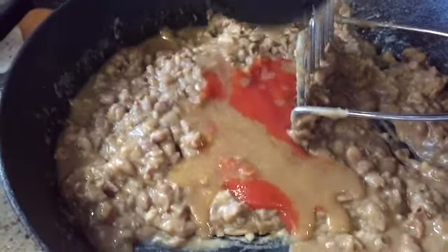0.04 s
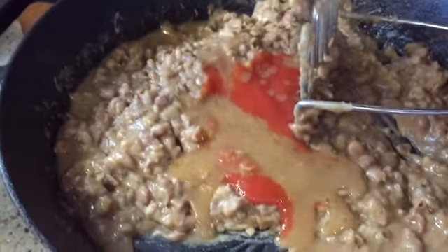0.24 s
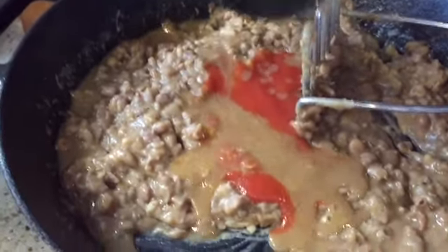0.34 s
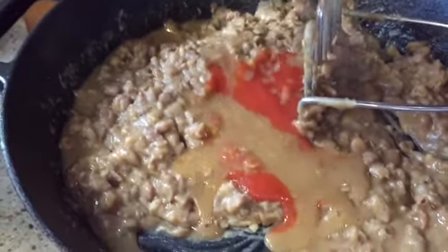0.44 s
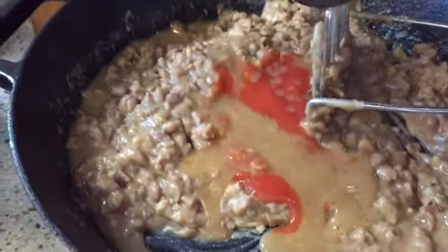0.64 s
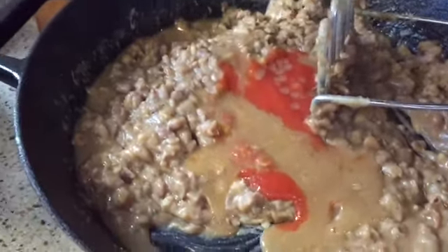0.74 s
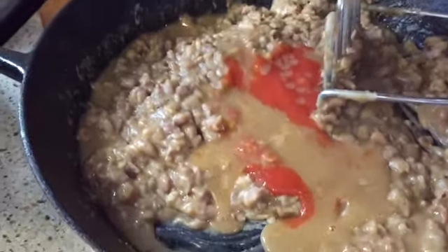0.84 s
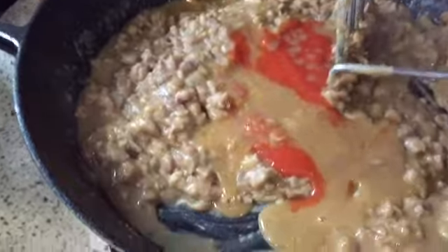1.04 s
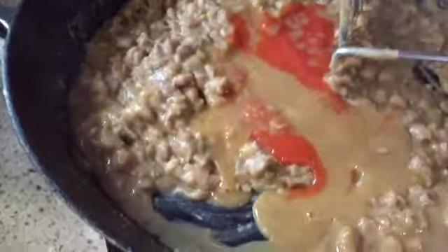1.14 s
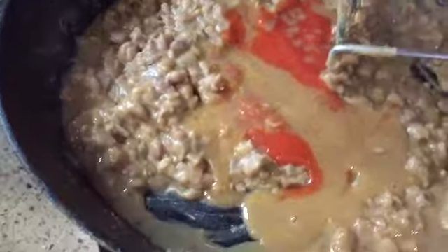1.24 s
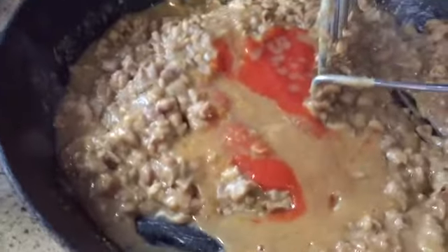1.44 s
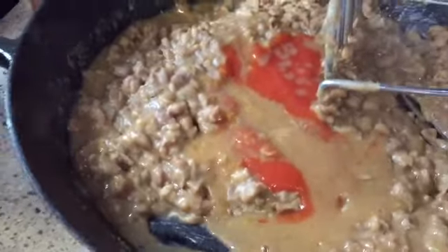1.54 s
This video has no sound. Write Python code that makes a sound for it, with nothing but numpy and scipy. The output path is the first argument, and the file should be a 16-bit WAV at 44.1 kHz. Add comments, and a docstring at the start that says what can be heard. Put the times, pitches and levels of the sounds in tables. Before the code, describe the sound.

A metal masher knocks on a cast iron skillet of soft food. An earlier clank's tail fades at the start, with a faint touch at 0.1 s. Four short, hard clinks follow at about 0.24, 0.40, 0.54 and 0.71 s, the third thickened by a flat slap. Brief pan rings and small-room echo die by 0.95 s, leaving low swelling rumble, hum, faint hiss and sparse tiny wet ticks until 1.6 s.

```python
"""Masher on a cast iron skillet

A steel masher touches the rim of a skillet full of soft food once, faintly, then knocks on it four times,
in a small kitchen. Each contact mixes damped sines for the clink and the fainter, longer pan ring with
a crack of shaped noise. Slaps of the flat masher, wet ticks, low swelling tones and faint pings are
scattered between. Below lie a low appliance rumble of swelling noise, a wavering hum and a steady hiss."""
import sys
import numpy as np
from scipy import signal
from scipy.io import wavfile

SR = 44100
rng = np.random.default_rng(int(sys.argv[2]) if len(sys.argv) > 2 else 0)


def boost_factor(decibels):
    """Convert a level in decibels to a linear amplitude factor."""
    exponent = np.asarray(decibels, float) / 20
    return 10 ** exponent


def file_out(sig):
    """Save sig as 16-bit WAV at sys.argv[1]."""
    # one column per channel
    cols = np.atleast_2d(sig).T
    # limit, then scale
    lim = np.clip(cols, -1, 1)
    pcm = np.round(lim * 32767).astype(np.int16)
    wavfile.write(sys.argv[1], SR, pcm)


N = 70560  # samples, 1.6 s

# a faint touch, then four knocks on the rim:
# start_s, level_db, brightness_db (per octave above the knee), body_db, ring_db
RIM_CONTACTS = [(0.1055, -35.5, -5, 2, 5), (0.2350, -9, -1, 2, -1.5), (0.3988, -12, 0.5, 0.5, -5),
                (0.5436, -11, 4, 5, -5), (0.7140, -14, -0.5, 8.5, 0)]


def knocks():
    """Masher against rim: the touch and the four knocks, after an earlier one whose tail still rings."""
    out = np.zeros(N)
    earlier = (-0.21, -7.5, 0, 0, 0)
    for row in [earlier] + RIM_CONTACTS:
        add(out, row[0], knock(*row))
    return out


def knock(start_s, level_db, bright_db, body_db, ring_db):
    """One contact: steel clink, crack and long rings, with the wake of pan and room."""
    t = np.arange(SR // 2) / SR
    x = clink(t, bright_db) + long_rings(t, start_s) + crack(t, bright_db)
    return boost_factor(level_db) * (x + wake(t, bright_db, body_db, ring_db))


# masher modes, damped by hand and food; neighbours start in opposite sense: pitch_hz, level_db, t60_s
MASHER_MODES = [(1453, -16.5, .03), (1960, -1.5, 0.021), (2195, 0.5, 0.015), (2750, -13.5, 0.016),
                (3786, -20.5, .02), (3985, -12, 0.035), (4343, -17.5, .02), (5427, -17.5, .04),
                (6060, -16, 0.023), (7030, -22, .03), (8543, -28.5, .04), (9300, -28, 0.0198),
                (11910, -29.5, 0.029)]
# first contact of steel on iron: pitch_hz, level_db, t60_s
SNAP_MODES = [(4000, -0.5, 0.00516), (6000, -3, 0.0045), (9320, -8, 0.0053), (12320, -16, 0.0015)]


def clink(t, bright_db):
    """Short steel modes of the masher, opened by the still shorter snap of first contact."""
    masher = modes(tilted(MASHER_MODES, bright_db), t)
    snap = boost_factor(bright_db) * modes(SNAP_MODES, t, turn=0.78)
    return thin(masher + snap)


# long rings, probably the skillet handle, woken by sharp contact: pitch_hz, level_db, t60_s
HANDLE_MODES = [(593.7, -41, 1), (840, -45.5, 0.21), (1072, -40, 0.47), (1470, -46, 0.29), (1780, -40, .45),
                (3195, -45, 0.26)]


def long_rings(t, start_s):
    """Lightly damped modes that beat gently until they are stilled."""
    stilled_s, stilled_t60_s = 0.886, 0.15
    stilling = boost_factor(-60 * np.maximum(t + start_s - stilled_s, 0) / stilled_t60_s)
    return modes(HANDLE_MODES, t, beat=0.35) * stilling * fade_end(t)


# colour of the crack: pitch_hz, density_db (per Hz, relative)
CRACK_COLOUR = [(200, -21.5), (600, -24), (1500, -5), (3000, 1), (4500, 6), (6500, 5), (10000, -6),
                (16000, -17)]


def crack(t, bright_db):
    """Noise burst of the impact, louder on bright knocks."""
    level_db = -11.5 + 0.65 * bright_db
    return boost_factor(level_db) * bands(CRACK_COLOUR, len(t)) * fall(t, 0.037)


# the flat of the masher follows onto the wall: start_s, level_db, body_db, ring_db
WALL_SLAPS = [(0.2435, -26, 5, 8), (0.5531, -7.5, -4.5, -1.5), (0.7235, -29.5, 4, 3),
              (0.7256, -21.5, -1, 0)]
# the slap, quickly stifled: pitch_hz, level_db, t60_s
FLAT_MODES = [(947.5, -16, 0.083), (1294, -12, 0.038), (1836, -6.5, 0.017), (2210, -4.5, 0.014),
              (2680, -10, 0.014), (3202, -13.5, .012)]


def slaps():
    """Flat steel on the pan wall: stifled modes and a dark wake."""
    out, t = np.zeros(N), np.arange(SR // 3) / SR
    for start_s, level_db, body_db, ring_db in WALL_SLAPS:
        slap = thin(modes(FLAT_MODES, t)) + wake(t, -12, body_db, ring_db)
        add(out, start_s, boost_factor(level_db) * slap)
    return out


def wake(t, bright_db, body_db, ring_db):
    """What follows any contact: ring of the wall, dull body and the room's return."""
    x = wall_ring(t, ring_db) + dull_body(t, body_db) + room_return(t, bright_db, body_db)
    return cut(x, 16250) * fade_end(t)


# skillet wall: pitch_hz, level_db, t60_s
WALL_MODES = [(537.7, -29.5, 0.16), (654, -36.5, .16), (830, -40.5, .2), (958.7, -30, 0.2),
              (1320, -33, .17), (1435, -31.5, 0.094), (1658, -39, 0.12), (1965, -33, .18),
              (2270, -33.5, 0.2), (2500, -35, 0.27), (2518, -44, 0.38), (2825, -38.5, .25),
              (3014, -46, 0.24), (2958, -46.5, .25)]


def wall_ring(t, ring_db):
    """Faint longer iron modes that beat strongly."""
    return boost_factor(ring_db) * modes(WALL_MODES, t, beat=0.7)


# dull body of pan and stove: pitch_hz, density_db (per Hz, relative)
THUD_COLOUR = [(120, -10.5), (300, -13), (600, -4), (1100, -6.5), (2000, -1), (3000, -7), (5000, -14)]


def dull_body(t, body_db):
    """Soft thud of pan and stove: noise that rises a little late and dies quickly."""
    return boost_factor(-13 + body_db) * bands(THUD_COLOUR, len(t)) * fall(t, 0.08, rise=0.012)


# colour of the room return: pitch_hz, density_db (per Hz, relative)
ROOM_COLOUR = [(150, -9.5), (400, -3.5), (900, 0.5), (2000, -3), (3500, -7), (6000, -5), (10000, -19),
               (16000, -23)]
# decay of the room: pitch_hz, t60_s
ROOM_DECAY = [(150, 0.15), (500, .33), (1500, 0.29), (3000, .28), (5000, .2), (8000, 0.21), (16000, .15)]


def room_return(t, bright_db, body_db):
    """Small-room tail: noise bands each with its own decay, partly following the blow's tone."""
    follows = 0.32  # dB per dB of brightness or body
    colour = tilted(ROOM_COLOUR, follows * bright_db)
    tail = bands(colour, len(t), lambda hz: fall(t, at_hz(ROOM_DECAY, hz), rise=0.004))
    return boost_factor(-30 + follows * body_db) * tail


# small wet ticks of food and wire: start_s, level_db (before the envelope), pitch_hz, t60_s
WET_TICKS = [(0.014, -52.5, 6800, 0.014), (0.087, -63, 7600, 0.035), (0.095, -54, 2500, 0.032),
             (0.1062, -52, 6100, 0.027), (0.106, -45, 1080, 0.056), (.116, -48, 1940, .03),
             (0.121, -54, 2500, 0.018), (0.145, -50, 3020, 0.0072), (0.177, -50, 4000, 0.0071),
             (0.212, -56.5, 2000, 0.06), (0.657, -45.5, 5340, 0.0048), (0.8527, -57.5, 3000, 0.018),
             (1.073, -59, 3500, .02), (1.2131, -49, 2955, 0.029), (1.2135, -70, 6000, .015),
             (1.43, -63, 8000, 0.019), (1.585, -61, 5494, 0.024)]


def ticks():
    """Food and wire: short puffs of noise round one pitch."""
    out, t = np.zeros(N), np.arange(SR // 10) / SR
    half_band = 2 ** (0.45 / 2)  # the band spans 0.45 octave
    for start_s, level_db, hz, t60 in WET_TICKS:
        band = signal.butter(2, [hz / half_band, hz * half_band], "band", fs=SR, output="sos")
        puff = rms_one(signal.sosfilt(band, rng.standard_normal(len(t))))
        add(out, start_s, boost_factor(level_db) * puff * fall(t, t60, rise=0.0011))
    return out


# low tones, most of them after a knock: start_s, level_db (before the envelope), pitch_hz, t60_s
LOW_TONES = [(.0, -52.5, 296, .12), (.236, -35.5, 185.5, 0.14), (.252, -37.5, 334.2, 0.23),
             (.27, -39.5, 136.3, 0.21), (.415, -36.5, 333.4, 0.25), (.545, -43, 139.2, 0.078),
             (.58, -56, 322, 0.49)]


def hoots():
    """Low sines that swell in softly and die away."""
    return sines(LOW_TONES, 0.015)


# faint pings: start_s, level_db (before the envelope), pitch_hz, t60_s
FAINT_PINGS = [(0.757, -32.5, 2247, 0.037), (1.478, -52.5, 296.7, 0.11), (1.482, -58.5, 1670, .12),
               (1.488, -65.5, 3670, 0.073)]


def pings():
    """Faint decaying sines with a quicker onset."""
    return sines(FAINT_PINGS, 0.0035)


# colour of the rumble: pitch_hz, density_db (per Hz, relative)
RUMBLE_COLOUR = [(15, -63.5), (25, -37), (35, -15.5), (45, 3), (103, 2.5), (119, 0), (135, -5),
                 (186, -18.5), (220, -31.5), (300, -26), (390, -51), (660, -120)]
# swell of the rumble: start_s, level_db
RUMBLE_SWELL = [(0.0, -50), (0.142, -51.5), (0.172, -49), (0.316, -43.5), (0.36, -62.5), (0.396, -47),
                (0.418, -53.5), (0.45, -48.5), (0.658, -53), (0.672, -50.5), (0.97, -48), (1.01, -57.5),
                (1.126, -47.5), (1.23, -59), (1.3, -46.5), (1.456, -57), (1.484, -48), (1.6, -55)]


def rumble():
    """Low appliance rumble: shaped noise whose level swells and sinks."""
    swell_db = np.interp(np.arange(N) / SR, *np.transpose(RUMBLE_SWELL))
    return boost_factor(swell_db) * bands(RUMBLE_COLOUR, N)


def hum():
    """Wavering line in the rumble: noise through a very narrow band."""
    centre_hz, width_hz, level_db = 108, 5.1, -59
    edges = [centre_hz - width_hz / 2, centre_hz + width_hz / 2]
    line = signal.butter(1, edges, "band", fs=SR, output="sos")
    settled = signal.sosfilt(line, rng.standard_normal(2 * N))[N:]
    return boost_factor(level_db) * rms_one(settled)


# colour of the hiss: pitch_hz, density_db (per Hz, relative)
HISS_COLOUR = [(150, -41.5), (250, -10.5), (282, -16), (544, -7.5), (1050, -7), (1250, -9), (1510, -10.5),
               (2440, -13.5), (4630, -17.5), (15500, -24.5)]


def hiss():
    """Steady shaped noise at the bottom of the scene."""
    return boost_factor(-69) * cut(bands(HISS_COLOUR, N), 16250)


def modes(table, t, turn=-1., beat=0.):
    """Decaying sines, each struck with a slightly different strength; split pairs beat."""
    hz, db, t60 = np.transpose(table)[:, :, None]
    sense = turn ** np.arange(len(table))[:, None]  # sign or weight from one mode to the next
    beat_hz = rng.uniform(8, 35, db.shape)
    waver = 1 + beat * np.sin(2 * np.pi * (beat_hz * t + rng.random(db.shape)))
    struck_db = db + rng.normal(0, 2, db.shape)
    envelope = boost_factor(struck_db - 60 * t / t60)
    return np.sum(sense * waver * envelope * np.sin(2 * np.pi * hz * t), axis=0)


def sines(table, rise_s):
    """Single sines with a soft onset, placed by a table."""
    out, t = np.zeros(N), np.arange(SR // 2) / SR
    for start_s, level_db, hz, t60 in table:
        add(out, start_s, boost_factor(level_db) * np.sin(2 * np.pi * hz * t) * fall(t, t60, rise_s))
    return out


def bands(spectrum, size, shape=lambda hz: 1):
    """Third-octave bands of noise, each with its level and envelope; rms 1 before the envelope."""
    warm_up = 8000  # samples for the filters to settle
    white, out, plain = rng.standard_normal((2, size + warm_up)), 0, 0
    edges = 22 * 2 ** np.arange(0, 9.7, 1 / 3)
    for k, (low, high) in enumerate(zip(edges, edges[1:])):
        hz = np.sqrt(low * high)
        if spectrum[0][0] / 1.2 < hz < spectrum[-1][0] * 1.2:
            sos = signal.butter(2, [low, high], "band", fs=SR, output="sos")
            # neighbouring bands draw on different noise
            band = boost_factor(at_hz(spectrum, hz)) * signal.sosfilt(sos, white[k % 2])[warm_up:]
            out = out + band * shape(hz)
            plain = plain + band
    return out / np.sqrt(np.mean(plain ** 2))


def fall(t, t60, rise=1e-4):
    """Envelope that rises from t = 0 and dies by 60 dB in t60."""
    t = np.maximum(t, 0)
    return (1 - np.exp(-t / max(rise, 1e-5))) * boost_factor(-60 * t / t60)


def fade_end(t):
    """Straight fade over the last 0.1 s."""
    return np.minimum(1, 10 * (t[-1] - t))


def tilted(table, bright_db):
    """A table with its levels tilted, in dB per octave, above a 2600 Hz knee."""
    return [(hz, db + bright_db * max(np.log2(hz / 2600), 0), *rest) for hz, db, *rest in table]


def thin(x):
    """High-pass for the steel parts: thin steel radiates little bass."""
    return signal.sosfilt(signal.butter(2, 450, "high", fs=SR, output="sos"), x)


def cut(x, hz):
    """Steep low-pass, 50 dB down from hz upward."""
    return signal.sosfilt(signal.cheby2(10, 50, hz, fs=SR, output="sos"), x)


def rms_one(x):
    """Scale to rms 1."""
    return x / np.sqrt(np.mean(x ** 2) + 1e-20)


def at_hz(points, hz):
    """Read a table on a log-frequency axis."""
    table_hz, values = np.array(points).T
    return np.interp(np.log(hz), np.log(table_hz), values)


def add(out, start_s, x):
    """Mix x into out from start_s on; what falls outside is dropped."""
    i = int(start_s * SR)
    x = x[max(-i, 0):][:N - max(i, 0)]
    out[max(i, 0):max(i, 0) + len(x)] += x


def scene():
    """Knocks and small sounds over rumble, hum and hiss, in mono."""
    contacts = knocks() + slaps()
    small_sounds = ticks() + hoots() + pings()
    floor = rumble() + hum() + hiss()
    return (contacts + small_sounds + floor)[None]


def top_cut(x):
    """Nothing passes above the cut-off."""
    return signal.sosfilt(signal.butter(12, 16870, fs=SR, output="sos"), x)


def record(dry):
    """Takes off the extreme top of the mix."""
    mix = cut(dry, 16950)
    return top_cut(mix)


dry = scene()
out = record(dry)
file_out(out)
```